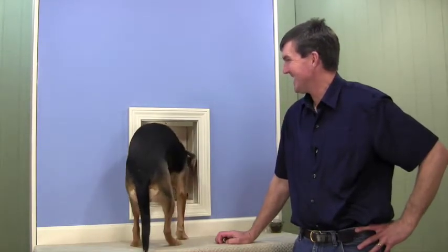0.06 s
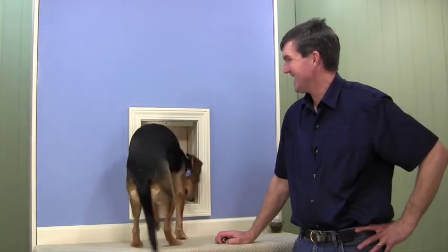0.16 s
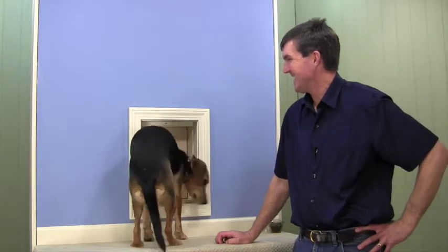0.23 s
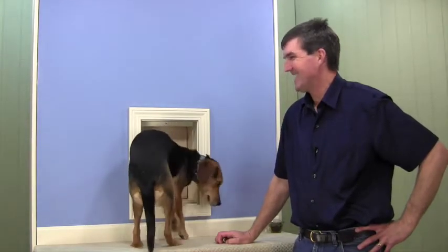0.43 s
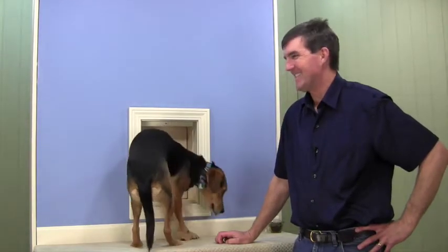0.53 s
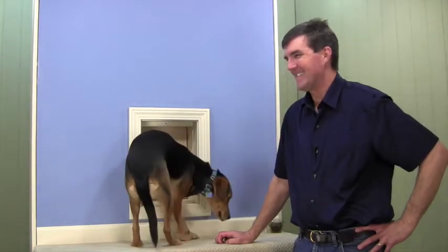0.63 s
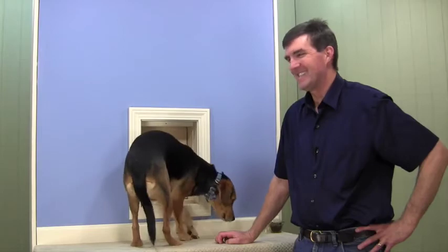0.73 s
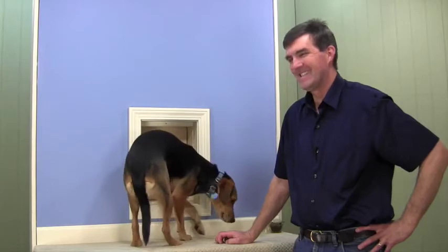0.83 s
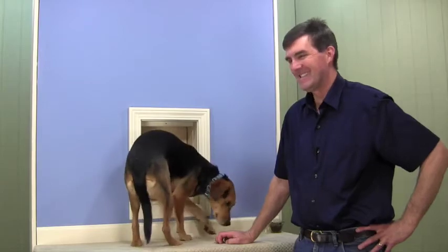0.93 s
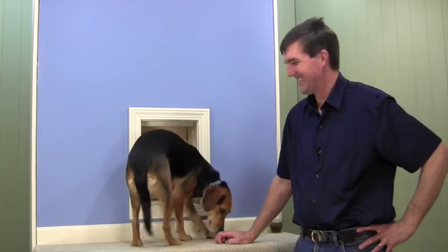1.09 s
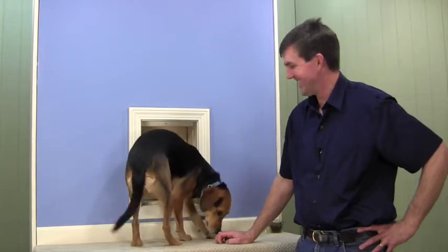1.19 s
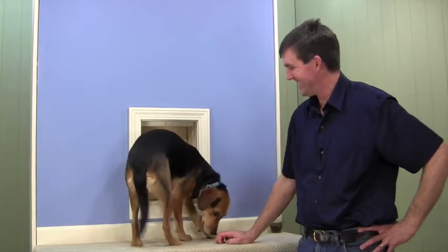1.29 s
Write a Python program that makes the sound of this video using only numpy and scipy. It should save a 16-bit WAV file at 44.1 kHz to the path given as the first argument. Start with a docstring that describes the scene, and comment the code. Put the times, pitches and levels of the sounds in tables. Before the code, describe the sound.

A pet door flap bangs shut once, then a dog's metal collar clinks lightly.

```python
"""A dog and a pet door

A dog backs out of a pet door in a small room: the flap ticks, then bangs shut and chatters against its
frame, which rings. The metal links of the collar strike each other and clink, paws land softly and fur
brushes past the frame, over a low room rumble. The sound is on the left; the right channel carries only
a faint copy and hiss."""
import sys
import numpy as np
from scipy import signal
from scipy.fft import rfft, irfft, next_fast_len
from scipy.io import wavfile

SR = 44100
rng = np.random.default_rng(int(sys.argv[2]) if len(sys.argv) > 2 else 0)


def dump_mix(stems):
    """Bounce the given channels to the path in sys.argv[1] as a 16-bit WAV at rate SR."""
    frames = np.atleast_2d(stems).T  # one column per channel
    limited = np.clip(frames, -1, 1)  # hard clip at full scale
    pcm = np.round(limited * 32767).astype(np.int16)
    wavfile.write(sys.argv[1], SR, pcm)


N = 59535  # samples: 1.35 s
TOP_HZ = 15750

# Tone colour of the room's rumble (frequency [Hz], relative level [dB])
RUMBLE_COLOUR = [(12, -17.5), (20, 9), (38, -9), (85, -5), (122, -14.5), (157, -12), (213, -22.5),
                 (289, -22.5), (333, -27), (452, -25.5), (1160, -36), (1670, -37), (2270, -41), (3080, -43),
                 (15500, -52.5)]
# Droning tones in the room (frequency [Hz], level [dB])
HUM_TONES = [(90, -51), (156, -53)]
RUMBLE_DB, HUM_WIDTH_HZ = -38, 7
# Tone colour of the hiss on the right (frequency [Hz], relative level [dB])
HISS_COLOUR = [(20, 24), (100, 10), (500, -1.5), (3000, -3.5), (15000, -6.5)]
HISS_DB, LEAK_DB = -60.5, -44

# Fur brushing the frame (peak time [s], half length [s], level [dB])
FUR_STROKES = [(0.554, .012, -49), (0.599, 0.017, -47.5), (.66, .02, -56), (.715, 0.0046, -56.5),
               (0.814, 0.017, -62)]
# Tone colour of rubbed fur (frequency [Hz], relative level [dB])
FUR_COLOUR = [(200, 8), (700, 1), (1600, 0.5), (3000, -7), (6000, -15), (14000, -27)]
# Paws shuffling on the carpet (peak time [s], half length [s], level [dB])
CARPET_STROKES = [(1.12, 0.05, -61.5), (1.29, 0.056, -55)]
# Tone colour of rubbed carpet (frequency [Hz], relative level [dB])
CARPET_COLOUR = [(100, -3), (400, -3), (750, 3), (1200, -12), (3000, -21), (12000, -26)]
# Soft steps (time [s], level [dB])
PAW_STEPS = [(0.502, -40), (0.633, -49), (.832, -53), (0.939, -48.5), (1.08, -49), (1.278, -47.5)]
# Tone colour of a step (frequency [Hz], relative level [dB])
PAW_COLOUR = [(60, -14), (180, 4), (400, 0), (700, -11.5), (1500, -29), (5000, -57)]
PAW_RISE_S, PAW_FADE_S = 0.0029, 0.15  # a fade time is how long a sound takes to drop by 60 dB

# A lone dry tick (time [s], level [dB])
LONE_TICK = [(1.2008, -24.5)]
# Tone colour of that tick (frequency [Hz], relative level [dB])
TICK_COLOUR = [(200, 3), (1000, -3), (2500, 0), (5000, -5), (9000, -8), (15000, -18.5)]
# The collar snapping tight (time [s], level [dB])
COLLAR_SNAPS = [(.1351, -45), (.4965, -26.5), (.5493, -23), (.7145, -34)]
# Tone colour of a snap (frequency [Hz], relative level [dB])
SNAP_COLOUR = [(500, -16), (2000, 0.5), (3300, -4.5), (4700, 1), (6500, -6), (9000, -8), (15000, -13.5)]

# Collar clinks (time [s], level [dB], fade time [s], boost of the two lowest notes [dB])
COLLAR_CLINKS = [(0.1357, -41.5, 0.027, 2), (0.1538, -46, 0.036, 4), (.169, -51, .03, -5),
                 (.4963, -30, 0.023, -16), (.508, -39, 0.067, -7), (0.5244, -38.5, 0.027, -3),
                 (0.5495, -43, 0.27, 5), (0.6667, -47, .04, -6), (0.7281, -33, 0.046, -2),
                 (0.7954, -45.5, 0.054, 7), (0.8765, -42, 0.028, -9), (1.0111, -56, .04, 9),
                 (1.226, -44.5, 0.092, -12), (1.2336, -42, 0.043, -11), (1.34, -53, .08, 11)]
# Notes that a metal link rings with (frequency [Hz], relative level [dB])
LINK_NOTES = [(6675, -4), (8445, -3), (9080, -0.5), (10330, -14), (10610, 2), (10860, 1), (10960, 5.5),
              (11150, -31)]
LINK_SCATTER_DB, LINK_DETUNE = 2.5, 0.0063  # no two links ring alike
# Tone colour of the click as two links meet (frequency [Hz], relative level [dB])
CLICK_COLOUR = [(2000, -3), (7000, -9), (11000, 14.5), (15000, -14)]
CLICK_DB, CLICK_FADE_S = -3, 0.0089
SING_START_S, SING_HZ, SING_DB, SING_RISE_S, SING_FADE_S = 0.551, 6690, -48, 0.043, 0.2
COLLAR_ECHO_DB, COLLAR_ECHO_FADE_S = -6.5, 0.14

# Tone colour of the bang's echo in the room (frequency [Hz], relative level [dB])
BANG_ECHO_COLOUR = [(60, -13.5), (200, -0.5), (350, -8.5), (540, 1.5), (670, -5), (900, -12.5), (1400, -15),
                    (2500, -22), (5000, -28), (8000, -35), (15000, -55)]
# How long the room echoes (frequency [Hz], fade time [s])
ROOM_FADE_TIMES = [(100, 0.39), (500, .4), (1500, 0.44), (4000, 0.35), (8000, 0.3), (15000, 0.22)]
BANG_ECHO_DB, BANG_ECHO_RISE_S = -16.5, 0.019
# Notes that the door frame and wall ring with (frequency [Hz], relative level [dB])
FRAME_NOTES = [(156, -3), (193, -1), (252, 0), (312, -6), (401, -2), (538, 4), (569, -1), (726, 2),
               (779, -5), (957, -4), (1117, -6), (1220, -7), (1323, -4), (1427, -8)]
SLAM_S, FRAME_DB, FRAME_RISE_S, FRAME_FADE_S = 0.2112, -23, 0.008, 0.29

# The flap hitting its frame (time [s], knock level [dB], crack level [dB], thump level [dB])
FLAP_HITS = [(0.1759, -33, -38.5, -43), (0.1822, -25, -36, -38), (0.2088, -49, -39, -13.5),
             (0.2093, -30, -16, -26), (0.2109, -14, -13, -30), (.2168, -15, -21.5, -31),
             (0.223, -19, -19.5, -7.5), (0.2407, -55, -51, -23)]
# Tone colour of the crack (frequency [Hz], relative level [dB])
CRACK_COLOUR = [(100, -8), (550, 2), (1000, -6.5), (2200, -10), (4000, -15), (7200, -20.5), (10000, -30),
                (15000, -59)]
KNOCK_HZ, KNOCK_FADE_S = 500, 0.045  # the flap's own dull note
CRACK_FADE_S, THUMP_HZ, THUMP_FADE_S = 0.027, 140, 0.029
PUFF_HZ, PUFF_DB, PUFF_FADE_S = 33.6, -18.5, 0.23


def amp(db):
    """Turn decibels into a number to multiply by."""
    return 10 ** (np.asarray(db) / 20)


def unit(x):
    """Scale a sound to an average strength (rms) of 1."""
    return x / np.sqrt(np.mean(x ** 2) + 1e-20)


def along(points, hz):
    """Read between the rows of a (frequency, value) table, on a log frequency scale."""
    freqs, values = np.transpose(points)
    return np.interp(np.log(hz + 1), np.log(freqs + 1), values)


def filtered(x, response):
    """Turn each frequency of x up or down by the gain response(hz)."""
    size = next_fast_len(N + SR // 2)
    return irfft(rfft(x, size) * response(np.fft.rfftfreq(size, 1 / SR)), size)[..., :N]


def noise(colour):
    """Noise of strength 1 with the given tone colour."""
    return unit(filtered(rng.standard_normal(N), lambda hz: amp(along(colour, hz))))


def since(start):
    """Seconds since the start time, zero before it."""
    return np.maximum(np.arange(N) / SR - start, 0)


def rise(t, rise_s):
    """Climb from 0 to 1 in rise_s seconds, then stay there."""
    return np.minimum(t / rise_s, 1)


def fade(t, fade_s):
    """Silent until t passes zero, then dropping by 60 dB every fade_s seconds."""
    return (t > 0) * np.exp(-np.log(1000) * t / fade_s)


def ring(t, hz, fade_s):
    """One pure note of a struck object, dying away."""
    return np.sin(2 * np.pi * hz * t) * fade(t, fade_s)


def pulse(colour):
    """One sudden click with the given tone colour and a peak of 1."""
    log_gain = np.log(amp(along(colour, np.fft.rfftfreq(512, 1 / SR))))
    # Keeping the first half of the cepstrum packs the energy at the start of the click.
    cepstrum = 2 * irfft(log_gain) * (np.arange(512) < 256)
    click = irfft(np.exp(rfft(cepstrum)))
    return click / np.abs(click).max()


def room_rumble():
    """The room rumbles, and two narrow bands of noise drone along."""
    drone = np.zeros(N)
    for pitch, db in HUM_TONES:
        band = filtered(rng.standard_normal(N), lambda hz: np.exp(-((hz - pitch) / HUM_WIDTH_HZ) ** 2))
        drone += amp(db) * unit(band)
    return amp(RUMBLE_DB) * noise(RUMBLE_COLOUR) + drone


def rubbing(strokes, colour):
    """Soft surfaces slide past each other: noise swells and fades with each stroke."""
    swells = sum(amp(db) * np.exp(-((since(0) - peak) / half) ** 2 / 2) for peak, half, db in strokes)
    return noise(colour) * swells


def paws():
    """Each paw lands on the carpet with a short burst of dull noise."""
    loudness = np.zeros(N)
    for start, db in PAW_STEPS:
        t = since(start)
        loudness += amp(db) * rise(t, PAW_RISE_S) * fade(t, PAW_FADE_S)
    return noise(PAW_COLOUR) * loudness


def ticks(events, colour):
    """Short dry ticks that do not ring: one pulse for each event."""
    hits = np.zeros(N)
    for start, db in events:
        hits[round(start * SR)] = amp(db)
    return signal.fftconvolve(hits, pulse(colour))[:N]


def singing_link():
    """One link swings free and rings on: a high note swells, then fades."""
    t = since(SING_START_S)
    dying = np.exp(-np.log(1000) * since(SING_START_S + SING_RISE_S) / SING_FADE_S)
    return amp(SING_DB) * rise(t, SING_RISE_S) * dying * np.sin(2 * np.pi * SING_HZ * t)


def link_ring(t, fade_s, low_boost_db):
    """A struck link rings with several high notes, a little different each time."""
    notes = np.zeros(N)
    for k, (hz, db) in enumerate(LINK_NOTES):
        sign = rng.choice([-1, 1])
        gain = amp(db + low_boost_db * (k < 2) + rng.normal(0, LINK_SCATTER_DB))
        pitch = hz * (1 + rng.normal(0, LINK_DETUNE))
        notes += sign * gain * ring(t, pitch, fade_s)
    return unit(notes) * np.std(fade(t, fade_s)) / 2  # long and short rings start about equally loud


def collar():
    """Metal links click together, ring and quickly still each other; the room echoes faintly."""
    clinks = np.zeros(N)
    for start, db, fade_s, low_boost_db in COLLAR_CLINKS:
        t = since(start)
        ringing = link_ring(t, fade_s, low_boost_db)
        click = amp(CLICK_DB) * noise(CLICK_COLOUR) * fade(t, CLICK_FADE_S)
        clinks += amp(db) * (ringing + click)
    room_tail = rng.standard_normal(N) * fade(since(0), COLLAR_ECHO_FADE_S)
    echo = signal.fftconvolve(clinks, room_tail / np.linalg.norm(room_tail))[:N]
    return clinks + amp(COLLAR_ECHO_DB) * echo


def bang_echo():
    """The slam spreads round the room as a wash of noise whose highs die first."""
    hz, times, bands = signal.stft(noise(BANG_ECHO_COLOUR), SR, nperseg=256)
    fades = fade(np.maximum(times - SLAM_S, 0), along(ROOM_FADE_TIMES, hz)[:, None])
    tail = signal.istft(bands * fades, SR)[1][:N]
    return amp(BANG_ECHO_DB) * rise(since(SLAM_S), BANG_ECHO_RISE_S) * tail


def frame_ring():
    """The hardest hit sets the frame ringing; the sound builds as it spreads through the wall."""
    t = since(SLAM_S)
    notes = sum(rng.choice([-1, 1]) * amp(db) * ring(t, hz, FRAME_FADE_S) for hz, db in FRAME_NOTES)
    return amp(FRAME_DB) * rise(t, FRAME_RISE_S) * notes


def flap():
    """Each hit on the frame knocks, cracks and thumps; the closing flap pushes a deep puff of air."""
    hits = np.zeros(N)
    for start, knock_db, crack_db, thump_db in FLAP_HITS:
        t = since(start)
        hits += amp(knock_db) * ring(t, KNOCK_HZ, KNOCK_FADE_S)
        hits += amp(crack_db) * noise(CRACK_COLOUR) * fade(t, CRACK_FADE_S)
        hits += amp(thump_db) * ring(t, THUMP_HZ, THUMP_FADE_S)
    puff = -amp(PUFF_DB) * ring(since(SLAM_S), PUFF_HZ, PUFF_FADE_S)
    return hits + puff


def scene():
    """Door, dog and room sound on the left and barely leak into the hiss on the right."""
    door = bang_echo() + flap() + frame_ring()
    jingle = collar() + singing_link() + ticks(COLLAR_SNAPS, SNAP_COLOUR)
    dog = paws() + rubbing(FUR_STROKES, FUR_COLOUR) + rubbing(CARPET_STROKES, CARPET_COLOUR)
    left = door + jingle + dog + ticks(LONE_TICK, TICK_COLOUR) + room_rumble()
    right = amp(LEAK_DB) * left + amp(HISS_DB) * noise(HISS_COLOUR)
    return np.array([left, right])


def record(dry):
    """Cut away everything higher than TOP_HZ."""
    return filtered(dry, lambda hz: hz < TOP_HZ)


dry = scene()
out = record(dry)
dump_mix(out)
```